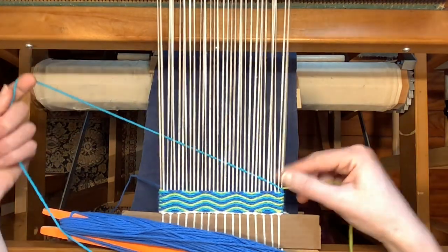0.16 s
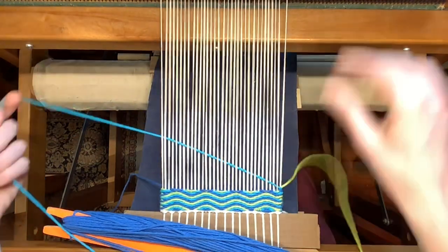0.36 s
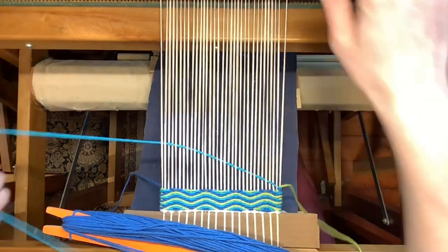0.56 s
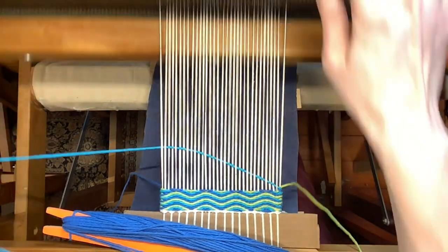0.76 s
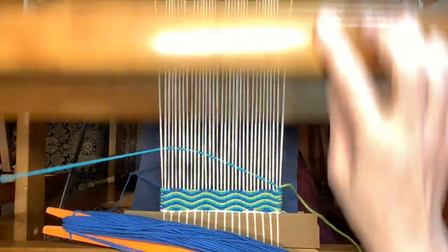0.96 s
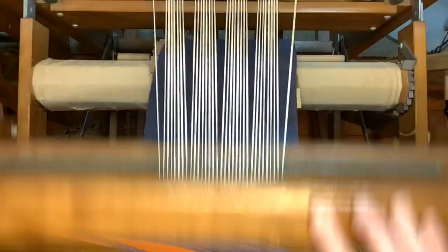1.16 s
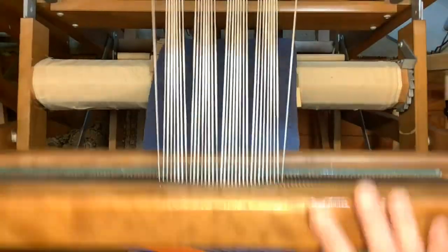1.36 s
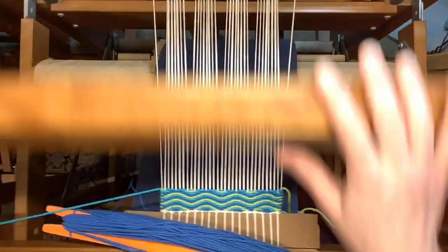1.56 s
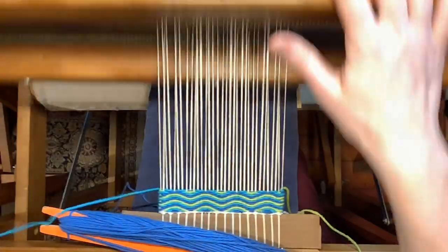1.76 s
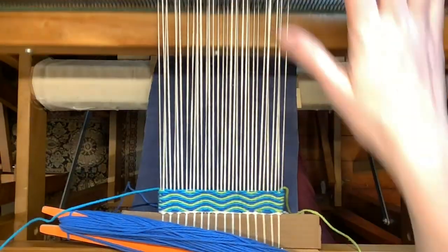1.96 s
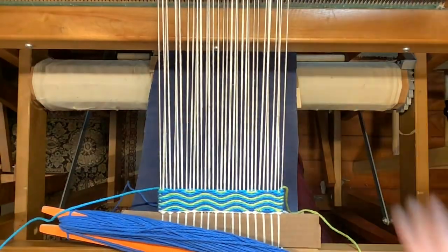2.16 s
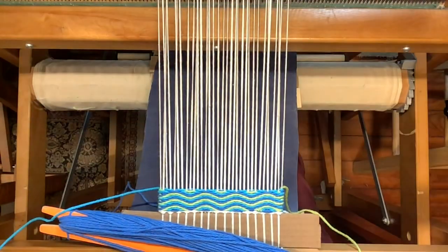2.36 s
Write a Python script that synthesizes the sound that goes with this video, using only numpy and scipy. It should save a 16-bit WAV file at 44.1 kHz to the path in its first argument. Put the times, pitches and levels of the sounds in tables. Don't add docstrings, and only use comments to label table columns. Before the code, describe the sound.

A wooden floor loom up close in a small room: a dry treadle squeal, loud rattling wooden knocks, a beater stroke with bright steel ticks and thread hiss, squeaky return, and a soft final knock.

```python
import sys
import numpy as np
from scipy import signal
from scipy.fft import rfft, irfft, next_fast_len
from scipy.io import wavfile
from scipy.ndimage import map_coordinates

SR = 44100
rng = np.random.default_rng(int(sys.argv[2]) if len(sys.argv) > 2 else 0)


def output_pcm(signal):
    pcm = np.clip(np.atleast_2d(signal).T, -1, 1) * 32767
    wavfile.write(sys.argv[1], SR, np.round(pcm).astype(np.int16))


def to_linear_factor(level_db):
    exponent = np.asarray(level_db, float) / 20
    return 10 ** exponent


N = 110250

# pitch_hz [Hz], level_db [dB]
THREADS = [(180, -38.5), (300, -16), (1730, -14), (2400, -11), (3350, -4), (6390, -5.5), (9820, -7),
           (15600, -15.5)]


def unit(x):
    return x / np.sqrt(np.mean(x ** 2) + 1e-20)


def along(points, hz):
    f, v = np.transpose(points)
    return np.interp(np.log(hz + 1), np.log(f + 1), v)


def wobble(rate, size):
    return map_coordinates(rng.standard_normal(size // 8 + 4), [np.arange(size) * rate / SR])


def filtered(x, response):
    m = next_fast_len(len(x) + 8192)
    return irfft(rfft(x, m) * response(np.fft.rfftfreq(m, 1 / SR)), m)[:len(x)]


def add(track, s, x):
    part = track[round(s * SR):][:len(x)]
    part += x[:len(part)]


def knocks():
    # start_s [s], peak_db [dB], decay_s [s per 60 dB], tilt_db [dB per octave]
    knock_rows = [(.094, -53, 0.18, -2), (0.196, -26, 0.13, -5.5), (0.3566, -10.5, 0.098, 1),
                  (.366, -18, .1, -1), (.404, -24, 0.11, -1.5), (.421, -4, 0.07, 0.77),
                  (0.4314, -9.5, 0.08, 2), (.44, -12, 0.15, 2), (.459, -15, 0.08, -0.5), (.47, -18, .14, 0),
                  (0.4925, -11, 0.061, -1), (.499, -17.5, .1, -1), (1.225, -51, .4, -4),
                  (1.25, -37, 0.14, -1), (1.2594, -27.5, 0.077, 0), (1.268, -30, 0.11, -1.5),
                  (2.06, -30.5, 0.073, -2), (2.072, -32, 0.068, 0.5), (1.878, -45.5, 0.052, -11)]
    # pitch_hz [Hz], level_db [dB]
    slat_colour = [(35, -55.5), (60, -41), (156, -20.5), (346, -11), (389, -5), (1310, -2.5), (1700, -4.5),
                   (9130, -8), (16000, -18)]
    crack_s, crack_gain, rise_s, chatter_db = 0.012, 0.82, 0.0008, 2.5
    out, t = np.zeros(N), np.arange(SR // 4) / SR
    for start_s, peak_db, decay_s, tilt_db in knock_rows:
        tilt = lambda f: to_linear_factor(tilt_db * np.log2((f + 300) / 1500))
        noise = rng.standard_normal(len(t))
        slats = unit(filtered(noise, lambda f: to_linear_factor(along(slat_colour, f)) * tilt(f)))
        shape = to_linear_factor(-60 * t / decay_s) + crack_gain * to_linear_factor(-60 * t / crack_s)
        shape = shape * np.minimum(t / rise_s, 1)
        chatter = chatter_db * np.minimum(100 * t, 1) * wobble(346, len(t))
        add(out, start_s, to_linear_factor(peak_db - 10.5 + chatter) * shape * slats)
    return out


def raps():
    # start_s [s], peak_db [dB], pitch_hz [Hz], decay_s [s per 60 dB]
    rap_rows = [(0.3563, -15, 2950, 0.023), (0.3577, -19, 1910, 0.043), (.422, -12.5, 1346, 0.027),
                (0.4217, -18, 3270, 0.019), (.433, -19.5, 1247, 0.035), (0.4592, -21, 1300, 0.027),
                (.471, -21, 1354, .03), (.493, -13.5, 1270, 0.027), (0.4992, -18.5, 1460, 0.027),
                (1.2603, -32, 2430, 0.023), (1.282, -36.5, 643, 0.037), (1.3195, -26.5, 3580, 0.036),
                (1.319, -35.5, 1490, 0.04), (1.331, -31, 3550, 0.028), (1.619, -37.5, 784, 0.062),
                (1.619, -39, 485, .07), (.1955, -24.5, 983, 0.034), (2.062, -35, 2586, 0.037),
                (2.063, -37, 1420, 0.034), (2.07, -40.5, 326, 0.05), (2.123, -43, 3500, .04),
                (2.167, -48.5, 1766, 0.077), (2.181, -44, 698, 0.039), (2.2015, -42, 3470, 0.044)]
    rise_s = 0.00091
    out, t = np.zeros(N), np.arange(SR // 8) / SR
    for start_s, peak_db, pitch_hz, decay_s in rap_rows:
        unsteady_hz = pitch_hz * (1 + 0.05 * wobble(400, len(t)))
        turn = 2 * np.pi * np.cumsum(unsteady_hz) / SR
        add(out, start_s, to_linear_factor(peak_db - 60 * t / decay_s) * np.minimum(t / rise_s, 1) * np.sin(turn))
    return out


def taps():
    # start_s [s], peak_db [dB], favoured_hz [Hz]
    tap_rows = [(0.121, -36.5, 370), (.195, -22.5, 520), (.404, -19, 900), (.424, -24.5, 400),
                (.515, -32.5, 410), (0.556, -35, 403), (.712, -47.5, 650), (0.848, -45.5, 496),
                (.9, -41.5, 764), (.945, -40, 815), (1.267, -42, 504), (1.616, -33, 587),
                (1.685, -36.5, 388), (1.76, -42.5, 396), (2.249, -48, 700)]
    # pitch_hz [Hz], decay_s [s per 60 dB]
    beam_tones = [(290, 0.088), (435, 0.078), (770, 0.055), (890, 0.062), (1100, 0.052), (1300, 0.067),
                  (1450, 0.074)]
    rise_s, scatter_db = 0.0008, 2
    favour_db = 10.5
    out, t = np.zeros(N), np.arange(SR // 5) / SR
    for start_s, peak_db, favoured_hz in tap_rows:
        ring = np.zeros(len(t))
        for pitch_hz, decay_s in beam_tones:
            tone_db = scatter_db * rng.standard_normal() - favour_db * np.log2(pitch_hz / favoured_hz) ** 2
            tone_hz = pitch_hz * (1 + 0.015 * rng.standard_normal())
            ring += to_linear_factor(tone_db - 60 * t / decay_s) * np.sin(2 * np.pi * tone_hz * t)
        add(out, start_s, to_linear_factor(peak_db) * (1 - np.exp(-t / rise_s)) * ring / np.abs(ring).max())
    return out


def thuds():
    # start_s [s], peak_db [dB], pitch_hz [Hz], decay_s [s per 60 dB]
    thud_rows = [
        (.197, -26, 316, 0.042),
        (0.278, -37.5, 201, 0.089),
        (.43, -35, 168.8, 0.24),
        (0.929, -56, 213.3, 0.27),
        (1.281, -35, 191.5, 0.13),
        (1.29, -47.5, 87.4, 0.45),
        (2.087, -32, 179.3, 0.07),
        (2.172, -42, 113, 0.15),
    ]
    waver, flutter_db = 0.1, 4
    out, t = np.zeros(N), np.arange(SR // 2) / SR
    for start_s, peak_db, pitch_hz, decay_s in thud_rows:
        turn = 2 * np.pi * np.cumsum(pitch_hz * (1 + waver * wobble(70, len(t)))) / SR
        boom_db = peak_db + flutter_db * wobble(60, len(t)) - 60 * t / decay_s
        add(out, start_s, to_linear_factor(boom_db) * (1 - np.exp(-t / 0.0017)) * np.sin(turn))
    return out


def ticks():
    # start_s [s], peak_db [dB], pitch_hz [Hz]
    tick_rows = [(0.6294, -35, 6300), (0.3235, -32, 9500), (0.8113, -32.5, 5950), (0.957, -48, 5800),
                 (1.0919, -46.5, 5800), (1.2988, -24, 2900), (1.3198, -9.5, 6670), (1.3266, -8, 6760),
                 (1.3344, -13, 6430), (1.3978, -13.5, 6170), (1.4127, -25, 4230), (1.4282, -19.5, 4700),
                 (1.4572, -23, 4880), (1.938, -33, 4500), (2.1015, -24.5, 6730), (2.1213, -26, 4390),
                 (2.2009, -27.5, 5730), (2.3813, -48, 2900)]
    decay_s, rise_s, snap_gain = 0.01, 0.00074, 0.61
    out, t = np.zeros(N), np.arange(SR // 20) / SR
    for start_s, peak_db, pitch_hz in tick_rows:
        near_pitch = lambda f: to_linear_factor(along(THREADS, f) - 7 * np.log2((f + 1) / pitch_hz) ** 2)
        snap = unit(filtered(rng.standard_normal(len(t)), near_pitch))
        shape = to_linear_factor(peak_db - 6.5 - 60 * t / decay_s) * np.minimum(t / rise_s, 1)
        add(out, start_s, shape * (np.sin(2 * np.pi * pitch_hz * t) + snap_gain * snap))
    return out


def stick_slip(hz, level, octave_db, waver, flutter_db):
    size = len(hz)
    turn = 2 * np.pi * np.cumsum(hz * (1 + waver * wobble(450, size))) / SR
    tone = to_linear_factor(flutter_db * wobble(330, size)) * np.sin(turn)
    octave = to_linear_factor(octave_db) * to_linear_factor(flutter_db * wobble(330, size)) * np.sin(2 * turn)
    return np.sqrt(2) * level * (tone + octave)


def pivots():
    # start_s [s], length_s [s], level_db [dB], first_hz [Hz], last_hz [Hz]
    squeals = [
        (.121, 0.027, -47, 6330, 6130),
        (.195, 0.031, -39, 6510, 6020),
        (.222, 0.033, -31, 5990, 6260),
        (.26, .012, -32.5, 5920, 6210),
        (.27, 0.033, -37, 5830, 6050),
        (.27, 0.019, -39, 5630, 5770),
        (.32, 0.0075, -29.5, 6090, 6000),
        (.338, 0.023, -45.5, 6150, 6050),
        (.363, 0.009, -24, 6030, 6021),
        (.376, 0.054, -40, 6120, 6480),
    ]
    # start_s [s], length_s [s], level_db [dB], first_hz [Hz], last_hz [Hz]
    squeaks = [(.075, 0.018, -72, 5900, 5900), (.15, 0.081, -49, 10620, 10880),
               (.21, 0.017, -44.5, 4700, 4560), (.284, .03, -48, 7870, 7860),
               (.258, 0.014, -43, 1020, 1030), (1.259, 0.021, -43, 13600, 13450),
               (1.266, .008, -45, 6300, 6150), (1.506, .03, -40.5, 5820, 5870),
               (1.595, .014, -30.5, 5951, 5961), (1.612, 0.032, -33, 6010, 6080),
               (1.599, 0.029, -39.5, 8940, 9130), (1.62, 0.057, -41.5, 8680, 8645),
               (1.608, 0.039, -42.5, 2975, 3047), (1.625, 0.012, -32.5, 7261, 7251),
               (1.641, 0.035, -46.5, 1860, 1700), (1.694, 0.0135, -47, 1700, 2050),
               (1.706, 0.028, -44.5, 1880, 1900), (1.728, 0.0216, -39, 1920, 2130),
               (1.753, 0.011, -39, 2130, 2180), (1.768, .018, -50, 2150, 2200),
               (1.708, 0.027, -31, 7400, 7270), (1.733, .03, -47, 7300, 7200),
               (1.722, 0.02, -19, 6520, 6550), (1.735, 0.01, -25.5, 6550, 6590),
               (1.735, 0.02, -32, 11301, 11302), (1.752, 0.064, -41.5, 5850, 5760),
               (1.76, .02, -46, 11850, 11850), (1.91, 0.024, -55.5, 2200, 2100),
               (1.7, .011, -47, 4050, 3900), (1.735, .018, -47.5, 3950, 4350), (1.8, 0.01, -51, 4300, 3780),
               (1.656, .011, -48, 3380, 3350), (1.674, .008, -51, 4200, 3600),
               (1.64, .02, -44.5, 5600, 5250), (1.742, .014, -39.5, 6200, 6000),
               (1.744, .012, -51.5, 2650, 2570), (1.5, 0.012, -48, 5400, 4800)]
    out = np.zeros(N)
    for rows, octave_db, waver, flutter_db in ((squeals, 0, 0.02, 3), (squeaks, -21.5, 0.008, 3)):
        for start_s, length_s, level_db, first_hz, last_hz in rows:
            u = np.arange(SR // 8) / SR / length_s
            shape = np.clip(u / 0.25, 0, 1) * np.clip((1.2 - u) / 0.48, 0, 1)
            glide_hz = first_hz + (last_hz - first_hz) * np.minimum(u, 1)
            gain_db = octave_db if first_hz < SR / 5.5 else -120
            add(out, start_s, stick_slip(glide_hz, to_linear_factor(level_db) * shape, gain_db, waver, flutter_db))
    return out


def threads():
    # start_s [s], level_db [dB], rise_s [s], fall_s [s per 60 dB]
    strokes = [
        (0.079, -58.5, 0.045, 10),
        (.19, -44, 0.11, 1.16),
        (.36, -49, 0.087, 1.32),
        (.8, -58, 0.096, 0.2),
        (1.169, -51.5, 0.13, 5),
        (1.311, -31, 0.042, .5),
        (1.45, -44.5, 0.15, 2),
        (1.701, -49, 0.028, 1.5),
        (2.06, -47.5, 0.12, 0.58),
    ]
    t = np.arange(N) / SR
    power = np.zeros(N)
    for start_s, level_db, rise_s, fall_s in strokes:
        fall = to_linear_factor(level_db - 60 * np.maximum(t - start_s - rise_s, 0) / fall_s)
        power += (fall * np.clip((t - start_s) / rise_s, 0, 1)) ** 2
    snags_per_s, snag_db, snag_share = 500, 4, 0.35
    snag_size = to_linear_factor(snag_db * np.minimum(rng.exponential(size=N), 2))
    hits = (rng.random(N) < snags_per_s / SR) * snag_size
    snags = np.convolve(hits, to_linear_factor(-60 * np.arange(200) / SR / 0.0019))[:N]
    rub = (1 + snag_share * unit(snags)) * to_linear_factor(1.5 * wobble(60, N)) * rng.standard_normal(N)
    reed = lambda f: 1 + sum(0.76 / (1 + ((f - hz) / 85) ** 2) for hz in (1960, 6670))
    return np.sqrt(power) * unit(filtered(rub, lambda f: to_linear_factor(along(THREADS, f)) * reed(f)))


def frame():
    # pitch_hz [Hz], level_db [dB]
    frame_colour = [(26, -36.5), (45, -5), (86, -1), (300, -8), (643, -13), (1200, -14.5), (2000, -22),
                    (4000, -70)]
    # time_s [s], level_db [dB]
    murmur = [(0, -85), (.08, -80.5), (0.201, -55), (.45, -51), (.6, -62.5), (.78, -67.5), (.95, -59.5),
              (1.1, -76.5), (1.19, -74), (1.3, -53), (1.52, -60.5), (1.7, -56.5), (1.83, -58), (2, -72),
              (2.149, -57.5), (2.5, -80.5)]
    rumble = filtered(rng.standard_normal(N), lambda f: to_linear_factor(along(frame_colour, f)))
    lumps = unit(to_linear_factor(3.6 * wobble(30.04, N)) * rumble)
    return to_linear_factor(np.interp(np.arange(N) / SR, *np.transpose(murmur))) * lumps


def room(x):
    # pitch_hz [Hz], decay_s [s per 60 dB]
    room_decay = [(150, 0.43), (1000, 0.18), (5000, 0.31), (14000, 0.31)]
    out, size = np.zeros(N), SR // 16
    for start in range(0, N, size):
        hz, t, z = signal.stft(rng.standard_normal(SR // 2), SR, nperseg=256)
        fading = z * to_linear_factor(-60 * t / along(room_decay, hz)[:, None])
        tail = signal.istft(fading, SR, nperseg=256)[1]
        echo = signal.fftconvolve(x[start:start + size], tail / np.linalg.norm(tail))
        add(out, start / SR + 0.004, echo)
    return out


def scene():
    blows = knocks() + taps() + thuds() + ticks()
    rings = raps()
    squeaks = pivots()
    sent = blows + to_linear_factor(-9) * rings + to_linear_factor(-6.5) * squeaks
    mix = blows + rings + squeaks + to_linear_factor(-6) * room(sent) + threads() + frame()
    return mix[None]


def top_cut(x):
    return signal.sosfilt(signal.butter(12, 16450, fs=SR, output="sos"), x)


def record(dry):
    # pitch_hz [Hz], level_db [dB]
    hiss_colour = [(35, -32), (60, -19.5), (2650, -2.5), (16000, -21)]
    hiss = unit(filtered(rng.standard_normal(N), lambda f: to_linear_factor(along(hiss_colour, f))))
    band = lambda f: (1j * f / (47 + 1j * f)) ** 4 * np.clip((15900 - f) / 250 + 0.5, 0, 1)
    mix = filtered(dry[0] + to_linear_factor(-80) * hiss, band)
    return top_cut(mix[None])


dry = scene()
out = record(dry)
output_pcm(out)
```